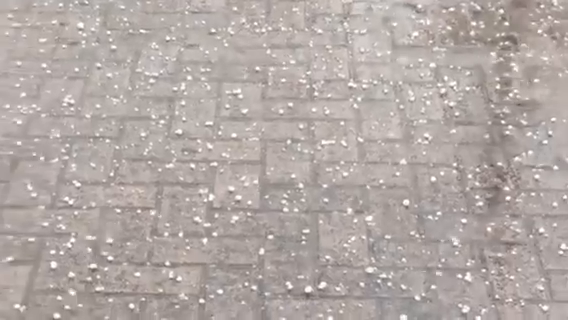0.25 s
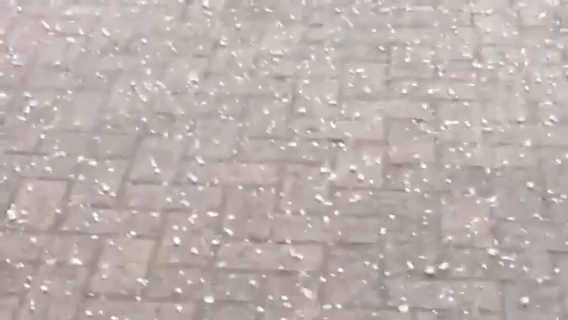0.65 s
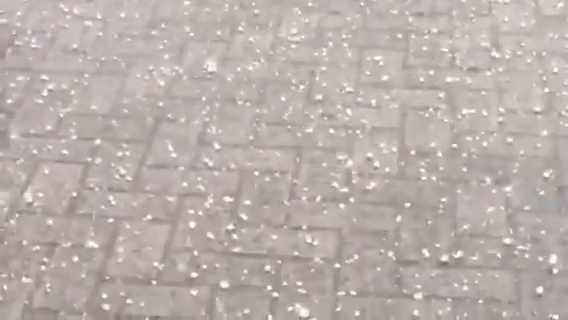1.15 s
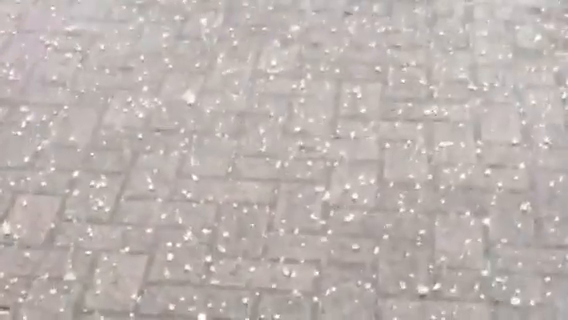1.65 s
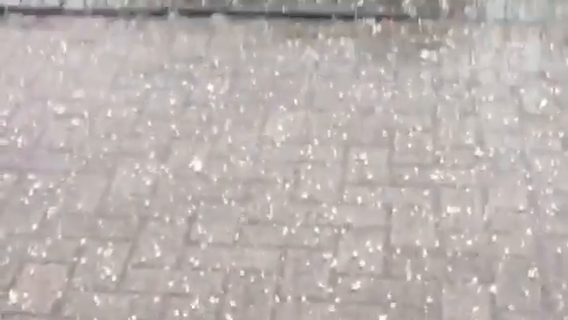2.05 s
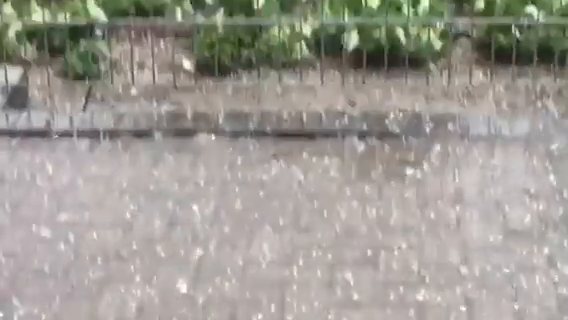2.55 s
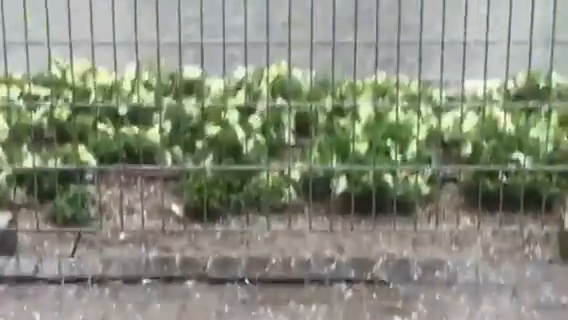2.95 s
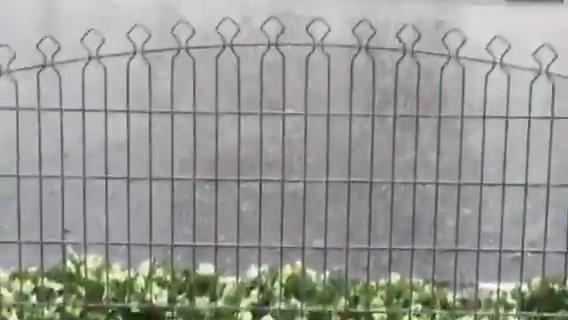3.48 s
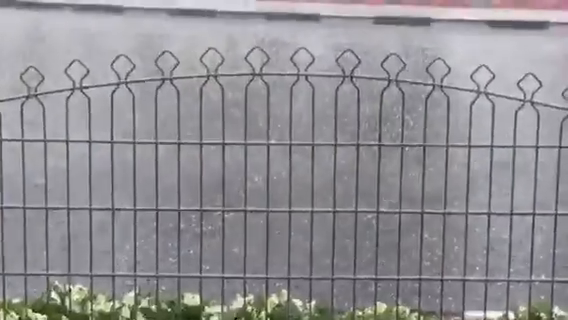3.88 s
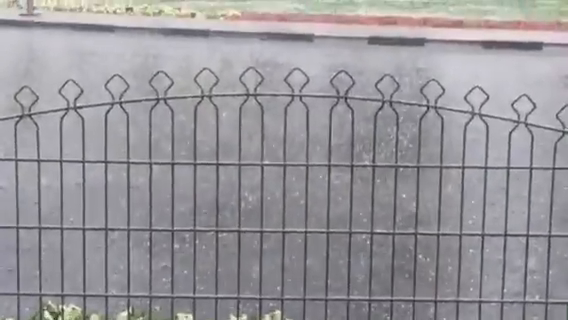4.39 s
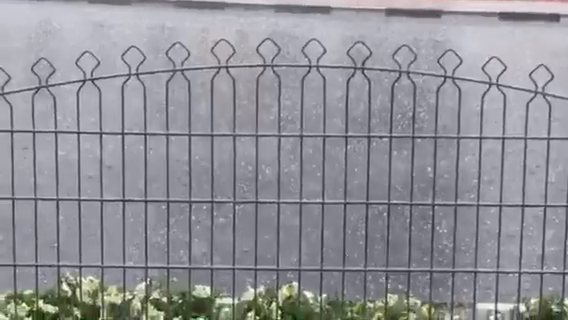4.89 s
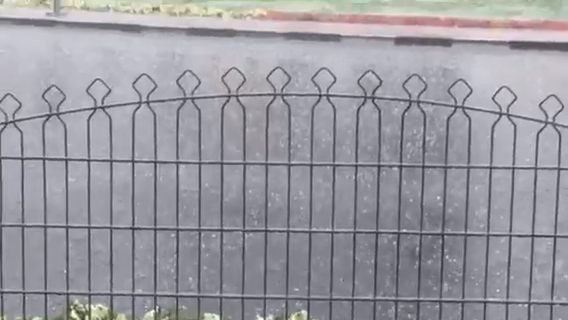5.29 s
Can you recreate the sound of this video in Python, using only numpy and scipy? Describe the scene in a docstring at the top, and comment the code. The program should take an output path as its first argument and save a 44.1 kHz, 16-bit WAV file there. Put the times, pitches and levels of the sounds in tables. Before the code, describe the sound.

Steady hail mixed with heavy rain on paving stones, heard close by with a small mono microphone that cuts the highest treble. Countless far impacts blur into a grainy hiss, while scattered nearby stones make dry, very short clicks. Faint street rumble and a wavering distant engine stay low. A faint whine falls and vanishes in the first second; a hollow tap sounds around the middle and a brief rattle of taps just before the end.

```python
"""Hail and heavy rain fall on paving and a street, heard from close by with one small microphone.
From the start, countless far impacts merge into a wash of hiss, clicks, fizz and ringing bubbles. Under
it lie a low rumble with swells, a distant engine's hum and, for about 0.7 s, a faint falling whine.
From 0.4 s on, near hailstones strike as dry clicks of one or a few cycles. A hollow tap comes at 2.8 s
and a little clatter of taps near the end, at 5.4 s."""
import sys
import numpy as np
from scipy import signal
from scipy.fft import rfft, irfft, next_fast_len
from scipy.io import wavfile
from scipy.ndimage import uniform_filter1d

SR = 44100
rng = np.random.default_rng(int(sys.argv[2]) if len(sys.argv) > 2 else 0)


def waveform_to_disk(signal):
    """Save audio, clipped to [-1, 1], as 16-bit WAV at the path in sys.argv[1]."""
    frames = np.transpose(np.atleast_2d(signal))
    scaled = np.clip(frames, -1, 1) * 32767
    samples = np.round(scaled).astype(np.int16)
    wavfile.write(sys.argv[1], SR, samples)


N = 243917  # length in samples, about 5.5 s


def gain_of(db):
    """Turns decibels into amplitude."""
    return 10 ** (np.asarray(db) / 20)


def evened(x):
    """Scales a sound to rms 1."""
    return x / np.sqrt(np.mean(x ** 2) + 1e-20)


def read(points, hz):
    """Reads a spectrum's dB at any frequency, with straight lines over log frequency."""
    f, db = np.transpose(points)
    return np.interp(np.log(hz + 1), np.log(f + 1), db)


def curves(rows):
    """Draws each column of a time table as a curve, sample by sample."""
    s, *columns = np.transpose(rows)
    times = np.arange(N) / SR
    return [np.interp(times, s, column) for column in columns]


def coloured(x, points):
    """Filters a sound by a spectrum given in dB."""
    hz = np.fft.rfftfreq(N, 1 / SR)
    return irfft(rfft(x) * gain_of(read(points, hz)), N)


def drift(rate_hz):
    """Random motion of rms 1: noise that fades out above rate_hz."""
    size = next_fast_len(N)
    hz = np.fft.rfftfreq(size, 1 / SR)
    keep = np.exp(-(hz / rate_hz) ** 2) * (hz > 0)  # no constant offset
    noise = rng.standard_normal(size)
    return evened(irfft(rfft(noise) * keep, size)[:N])


def wavering(turns, depth, rate_hz):
    """A tone of rms 1 whose strength and phase wander; turns counts its cycles."""
    path = 1 + depth * (drift(rate_hz) + 1j * drift(rate_hz))
    spin = np.exp(2j * np.pi * (turns + rng.random()))
    return evened((path * spin).real)


def add(mix, s, sound):
    """Mixes a sound in at a time in seconds."""
    part = mix[max(round(s * SR), 0):][:len(sound)]
    part += sound[:len(part)]


def click(hz, turn, cycles=0.53, size=161):
    """Ice meets stone: a cycle or a few of pressure, higher for a shorter contact."""
    phase = (np.arange(size) - size // 2) * hz / SR  # in cycles, 0 at the middle
    swell_and_fade = np.exp(-(phase / cycles) ** 2)
    return swell_and_fade * np.sin(2 * np.pi * (phase + turn))


# The tone balance of far rain and hail. Each row: frequency in Hz, relative level in dB per Hz.
WASH_SPECTRUM = [(100, -12), (330, 2.5), (560, 2.5), (800, 3.5), (1100, 4), (1500, 3.5), (2200, 4.5),
                 (2900, 2), (4000, 4), (7000, -2.5), (11000, -7.5)]


def wash(level_db=-0.3, patchy_db=1.55):
    """Far impacts merge into a hiss whose bands swell and fade in small patches."""
    frames, hz = N // 128 + 5, np.fft.rfftfreq(512, 1 / SR)
    real, imag, patches = rng.standard_normal((3, frames, len(hz)))
    patches = uniform_filter1d(patches, size=8, axis=0)  # smooth over time
    patches = evened(uniform_filter1d(patches, size=3, axis=1))  # smooth over frequency
    bands = (real + 1j * imag) * gain_of(read(WASH_SPECTRUM, hz) + patchy_db * patches)
    hiss = signal.istft(bands.T, nperseg=512, noverlap=384)[1][:N]
    return gain_of(level_db) * evened(hiss)


def hail(level_db=-5.0, per_s=2800, nearest=0.3, low_hz=3000, high_hz=9500, flurry=.16, count=24):
    """Stones of many sizes land evenly over a disc of ground; each is heard as 1 / distance."""
    out, flurries = np.zeros(N), np.exp(flurry * drift(35))
    for hz in np.geomspace(low_hz, high_hz, count):
        lands = rng.random(N) < flurries * per_s / count / SR
        distance = np.sqrt(nearest ** 2 + rng.random(N))  # as a share of the disc's radius
        blows = lands * rng.choice([-1, 1], N) / distance
        out += np.convolve(blows, click(hz, rng.uniform(-0.15, 0.17)), "same")
    return gain_of(level_db) * evened(out)


def splats(level_db=-10.5, per_s=150, low_hz=2200, high_hz=10000, width=0.28, fade_s=0.016,
           spread_db=4, count=48):
    """Wet stones burst and skitter: brief fading fizz in many pitch bands, each burst its own strength."""
    out, t = np.zeros(N), np.arange(SR // 25) / SR
    for hz in np.linspace(low_hz, high_hz, count):
        band = np.exp(-((np.fft.rfftfreq(len(t), 1 / SR) / hz - 1) / width) ** 2)
        noise = irfft(rfft(rng.standard_normal(len(t))) * band, len(t))
        fizz = evened(np.exp(-t / fade_s) * noise)
        lands = rng.random(N) < per_s / count / SR
        strength = gain_of(spread_db * np.minimum(rng.exponential(1, N), 2))
        out += signal.oaconvolve(lands * strength, fizz)[:N]
    return gain_of(level_db) * evened(out)


def splashes(level_db=-13, per_s=140, low_hz=900, high_hz=9500, cycles=16, count=40):
    """Drops on wet ground leave tiny bubbles that ring and die away; the higher, the more and the shorter."""
    out, t = np.zeros(N), np.arange(SR // 12) / SR
    for hz in np.geomspace(low_hz, high_hz, count):
        chance = per_s * np.sqrt(hz / low_hz) / count / SR  # per sample
        pops = (rng.random(N) < chance) * rng.uniform(0.21, 1, N)
        fade = np.sqrt(hz) * np.exp(-hz * t / cycles)
        ring = fade * np.sin(2 * np.pi * hz * rng.uniform(0.91, 1.03) * t)
        out += signal.oaconvolve(pops, ring)[:N]
    return gain_of(level_db) * evened(out)


# The tone balance of the street rumble. Each row: frequency in Hz, relative level in dB per Hz.
RUMBLE_SPECTRUM = [(20, -37), (33, -22), (46, 0), (58, -6.5), (80, 1), (140, -2), (220, -2.5), (300, -6.5),
                   (400, -15), (900, -35)]
RUMBLE_DB, RUMBLE_DB_PER_S = -32, 0.51  # the street slowly grows louder


def rumble(lumpy_db=1.5):
    """Low noise of the street, its level lumpy."""
    db = RUMBLE_DB + RUMBLE_DB_PER_S * np.arange(N) / SR
    lumps = lumpy_db * drift(19)
    noise = evened(coloured(rng.standard_normal(N), RUMBLE_SPECTRUM))
    return gain_of(db + lumps) * noise


# The distant engine's pace. Each row: time in seconds, firing rate in Hz.
ENGINE_PACE = [(0, 98), (.5, 97.4), (1.3, 96), (1.7, 94.3), (2.35, 94), (2.6, 92.3), (3.3, 92), (4.7, 92.3),
               (5.2, 94), (5.53, 93)]
# The engine's lowest harmonics come and go, each by itself. Each key is a multiple of the firing rate;
# each of its rows: time in seconds, level in dB before the engine's overall level is added.
ENGINE_HARMONICS = { .5: [(0, -45), (5.53, -47.5)], 1: [(0, -35), (.2, -29.5), (.33, -45), (.68, -41),
                    (.79, -31), (.88, -44), (1.35, -50), (1.85, -36), (2.2, -41), (2.47, -30), (2.8, -38),
                    (3.3, -34), (3.5, -43), (3.62, -36), (3.72, -24.5), (3.8, -42), (3.94, -38), (4.0, -29),
                    (4.13, -31), (4.2, -39), (4.33, -38), (4.4, -25.5), (4.48, -42), (5.15, -37),
                    (5.39, -27.5), (5.53, -33)], 1.5: [(0, -52), (3, -52), (3.6, -44), (4.75, -41),
                    (4.99, -31), (5.2, -38), (5.53, -45)], 2: [(0, -44), (.18, -49), (.36, -31.5),
                    (.52, -39), (1.13, -34), (1.22, -45), (1.53, -41), (1.62, -31.5), (1.72, -43),
                    (2.15, -48), (2.3, -35), (2.7, -44), (3.1, -36), (3.6, -47), (4.4, -45), (4.52, -35),
                    (4.62, -46), (4.82, -42), (4.91, -29), (5.01, -40), (5.53, -41)], 3: [(0, -37),
                    (.45, -32), (.62, -39), (.9, -42), (1.08, -35), (1.2, -42), (1.3, -30.5), (1.6, -37),
                    (1.75, -46), (1.88, -33), (2.2, -52), (2.36, -30), (2.57, -31.5), (2.68, -48),
                    (2.9, -46), (3.05, -38), (3.36, -34), (3.47, -47), (3.9, -31.5), (4.08, -48),
                    (4.28, -35), (4.38, -42), (4.48, -32.5), (4.6, -43), (4.93, -44), (5.05, -30.5),
                    (5.23, -27), (5.32, -32), (5.53, -36)]}
ENGINE_WAVER, ENGINE_WAVER_HZ = .28, 15  # depth as a share of the tone, and speed


def engine(level_db=-1.34):
    """Only the lowest harmonics carry this far; uneven cylinders add half orders."""
    hz, = curves(ENGINE_PACE)
    turns = np.cumsum(hz) / SR
    out = np.zeros(N)
    for multiple, levels in ENGINE_HARMONICS.items():
        db, = curves(levels)
        out += gain_of(level_db + db) * wavering(multiple * turns, ENGINE_WAVER, ENGINE_WAVER_HZ)
    return out


# the far whine: its sinking pitch, its swelling level and fade, its waver
WHINE_FROM_HZ, WHINE_TO_HZ, WHINE_SINK_S = 915, 763, .5
WHINE_DB, WHINE_DB_PER_S, WHINE_END_S, WHINE_FADE_S = -43.5, 7, .69, .045
WHINE_WAVER, WHINE_WAVER_HZ = .42, 18


def whine():
    """A faint far tone sinks towards a lower pitch, wavers and slowly swells, then fades."""
    t = np.arange(N) / SR
    hz = WHINE_TO_HZ + (WHINE_FROM_HZ - WHINE_TO_HZ) * np.exp(-t / WHINE_SINK_S)
    fade = 1 / (1 + np.exp((t - WHINE_END_S) / WHINE_FADE_S))  # half gone at WHINE_END_S
    tone = wavering(np.cumsum(hz) / SR, WHINE_WAVER, WHINE_WAVER_HZ)
    return gain_of(WHINE_DB + WHINE_DB_PER_S * t) * fade * tone


# Low swells in the rumble. Each row: middle in seconds, rms level at the middle in dB, pitch in Hz.
RUMBLE_SWELLS = [(0.08, -33.5, 62), (0.1, -37, 146), (0.38, -37, 60), (0.48, -36, 135), (1.58, -35, 132),
                 (1.79, -35, 125), (1.81, -36, 52), (3.6, -37, 55), (4.11, -30.5, 135), (4.29, -33, 157),
                 (4.4, -31.5, 62), (4.49, -35, 230), (4.65, -35, 125), (5.05, -35, 230), (5.27, -35, 68)]


def swells(level_db=0, half_length_s=0.043, waver=0.15):
    """The rumble bulges now and then around one low pitch."""
    t = np.arange(N) / SR
    out = np.zeros(N)
    for s, db, hz in RUMBLE_SWELLS:
        bulge = np.exp(-((t - s) / half_length_s) ** 2)
        out += gain_of(db + level_db) * bulge * wavering(hz * t, waver, 17)
    return out


# The nearest hailstones. Each row: middle of the click in seconds, level in dB before STONES_DB is added,
# click pitch in Hz, ring length in cycles (from the middle until it has faded to about a third).
NEAR_STONES = [(0.4154, -9, 3200, .5), (0.4243, -9, 6300, .5), (0.5035, -9, 7400, .5),
               (0.7583, -4, 6000, .55), (0.8372, -14, 6300, 1.3), (0.8487, -6, 5700, .5),
               (0.88, -8.5, 5200, .5), (1.1332, -4.5, 4700, .85), (1.213, -13, 6300, .8),
               (1.23, -15, 8400, 1.3), (1.2607, -15, 9300, 2.2), (1.4109, -10, 6300, .5),
               (1.4685, -11, 3500, .8), (1.5101, -17, 8400, 2.2), (1.6163, -7, 5700, .8),
               (1.6304, -10, 7000, .5), (1.8615, -17, 8400, 2.2), (1.873, -7, 3600, .7),
               (1.8986, -15, 6300, 2.2), (1.9698, -10.5, 8400, .8), (2.2597, -13, 7700, 1.3),
               (2.3993, -10, 4700, .8), (2.4901, -10, 7000, .5), (2.6514, -10, 6300, .5),
               (2.6958, -17, 8400, 2.2), (2.9684, -10.5, 4300, .8), (3.0016, -10, 5700, 1.3),
               (3.2005, -8, 7500, .5), (3.3384, -7, 6600, .5), (3.477, -5.5, 5700, .5),
               (3.5997, -13, 6300, 1.3), (3.8646, -9.5, 6000, .5), (3.9638, -8, 3500, .8),
               (4.1587, -4.5, 5000, .45), (4.3391, -15, 4300, 2.2), (4.6638, -11, 3500, 1.3),
               (4.7221, -12, 2600, .8), (4.9972, -7.5, 3100, .5), (5.0935, -8.5, 5200, .5),
               (5.4336, -8.5, 6300, 1.3)]
STONES_DB = 2.3  # raises all of them together


def near_stones():
    """The few that strike right by the microphone, each one crisp click."""
    out = np.zeros(N)
    for (s, db, hz, cycles), turn in zip(NEAR_STONES, rng.random(len(NEAR_STONES))):
        tick = click(hz, turn, cycles)
        start_s = s - len(tick) / 2 / SR
        add(out, start_s, gain_of(db + STONES_DB) * tick)
    return out


# Hollow, clearly pitched taps, most of them in one little clatter.
# Each row: start in seconds, rough peak level in dB, ring pitch in Hz.
HOLLOW_TAPS = [(2.793, -22, 2130), (5.411, -22, 2390), (5.452, -20.5, 2335), (5.454, -25, 540),
               (5.459, -26, 690), (5.464, -25, 490), (5.466, -21.5, 770), (5.467, -21.5, 2400),
               (5.470, -23, 2620), (5.494, -27, 950)]
TAP_RISE_S, TAP_T60_S = .005, .05  # soft onset, and time to fall by 60 dB


def taps(rough=0.45, rough_hz=110):
    """Something hollow is struck; each tap rings around one pitch and rattles a little."""
    out, t = np.zeros(N), np.arange(SR // 8) / SR
    fade = gain_of(-60 * t / TAP_T60_S) * (1 - np.exp(-(t / TAP_RISE_S) ** 2))
    for s, db, hz in HOLLOW_TAPS:
        tone = wavering(hz * np.arange(N) / SR, rough, rough_hz)
        ring = tone[:len(t)] / np.sqrt(2)
        add(out, s, gain_of(db) * fade / fade.max() * ring)
    return out


POUR_DB = -22.5  # how hard it pours


def scene(surge_db=0.25):
    """The downpour surges slightly over the street sounds, the same in both channels."""
    pour_gain = gain_of(POUR_DB + surge_db * drift(16))
    downpour = pour_gain * (wash() + hail() + splats() + splashes())
    mono = downpour + near_stones() + taps() + rumble() + swells() + engine() + whine()
    return np.array([mono, mono])


# The microphone's colour. Each row: frequency in Hz, gain in dB.
MICROPHONE_COLOUR = [(3000, -0.5), (4100, -2), (4550, -2), (4850, -5), (5300, -2.5), (6400, -1.5),
                     (7700, -3), (8900, 1), (9700, 0), (10200, -3.5), (10600, -15)]
EDGE_HZ = 10650  # upper limit of the band


def record(dry):
    """The microphone colours the sound, then a steep filter takes away everything above the band limit."""
    heard = np.array([coloured(channel, MICROPHONE_COLOUR) for channel in dry])
    edge = signal.firwin(511, EDGE_HZ, window=("kaiser", 9), fs=SR)
    return signal.oaconvolve(heard, edge[None], "same", axes=1)


dry = scene()
out = record(dry)
waveform_to_disk(out)
```